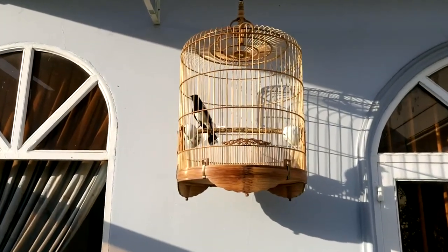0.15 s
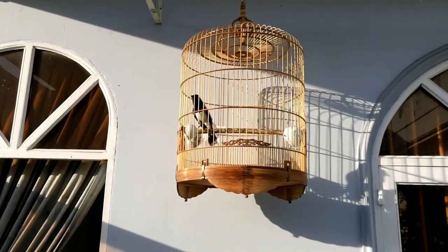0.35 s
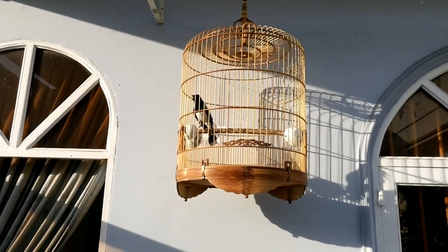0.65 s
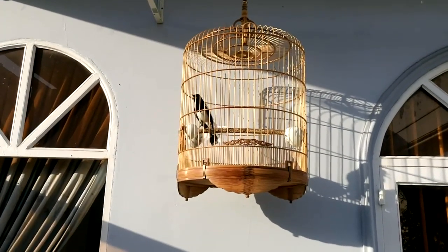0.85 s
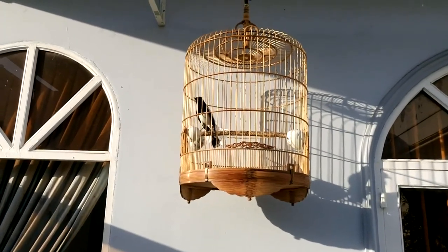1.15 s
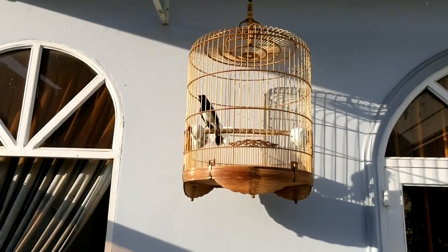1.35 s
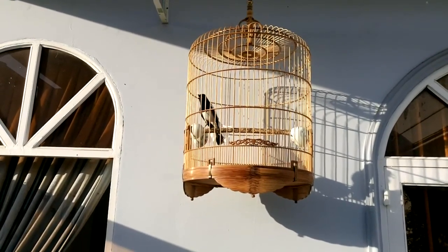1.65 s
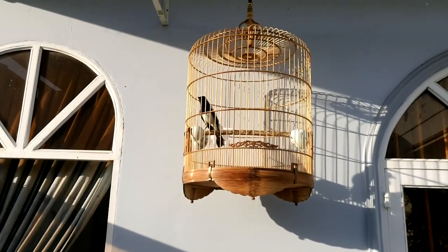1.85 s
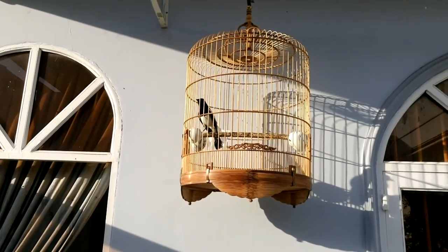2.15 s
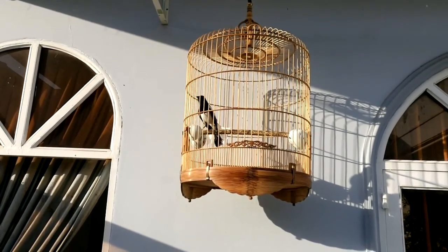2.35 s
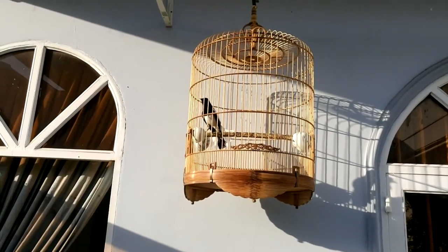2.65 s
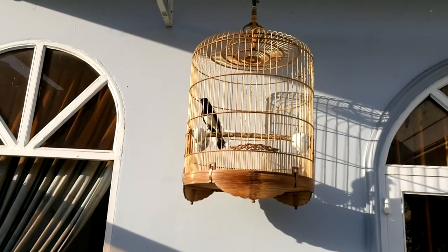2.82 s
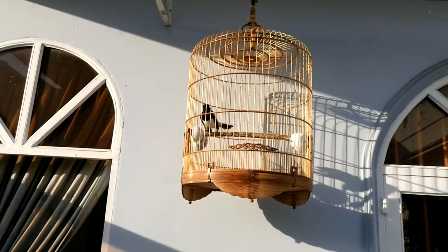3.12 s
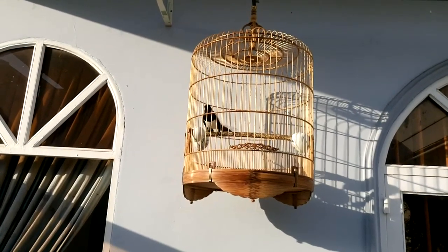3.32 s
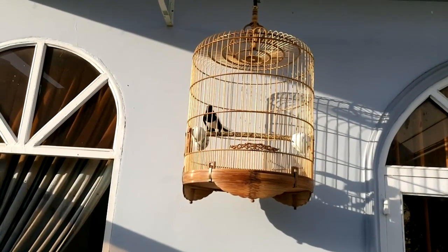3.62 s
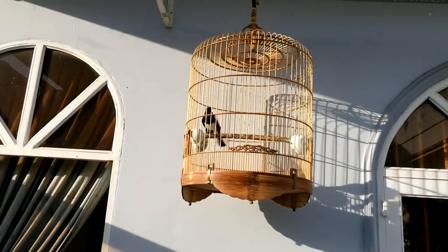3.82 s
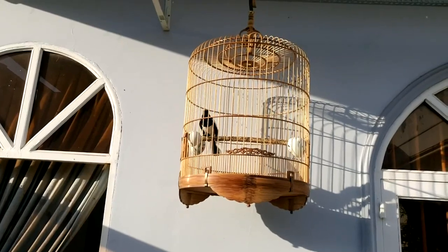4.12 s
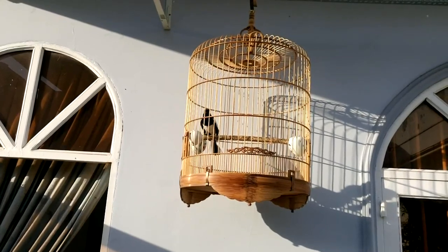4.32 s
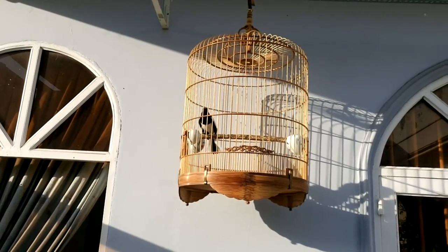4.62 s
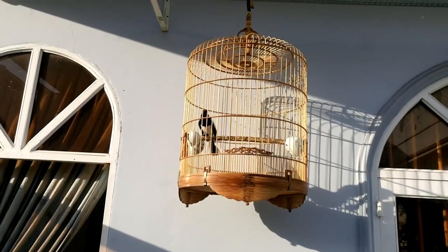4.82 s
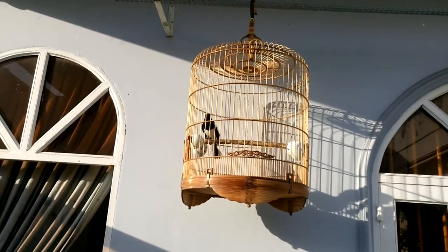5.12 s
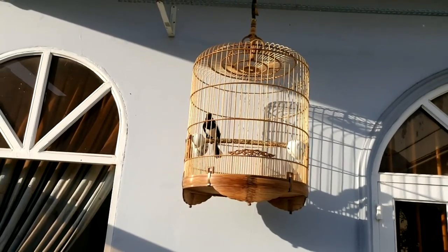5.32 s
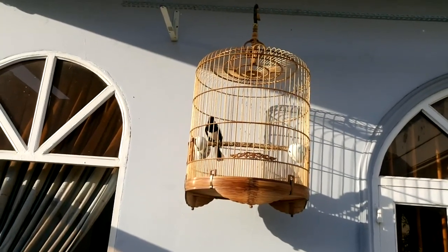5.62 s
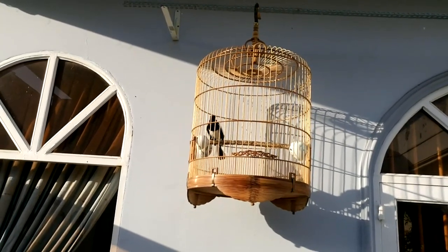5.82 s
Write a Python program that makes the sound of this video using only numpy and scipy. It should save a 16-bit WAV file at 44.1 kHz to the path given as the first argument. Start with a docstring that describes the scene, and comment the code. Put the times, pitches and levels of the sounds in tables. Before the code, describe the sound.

Outdoor stereo recording near a caged bird, its bright song stronger on the left. A busy phrase of whistles, drops and raspy rises fills the first two seconds over a distant rooster crow. A quiet neighbour warbles slightly right, then come steep chips, a buzz and three ticks. Far birds continue over faint traffic rumble and hiss, with porch echoes and brief overload on the loudest notes.

```python
"""Caged songbird in a walled yard

A magpie-robin sings close by: held whistles, plunges, buzzy rises and sharp falling chips, all gliding tones.
A softer bird warbles nearby, others answer from afar; a distant rooster crows at the start with pulses
and rasp, and a second one, of plain tones, faintly near the end. Delayed copies are the yard's echoes.
Filtered noise is the town's low rumble and thin hiss.
The loudest notes overload the recorder, which turns everything down for a moment.
"""
import sys
import numpy as np
from scipy import signal
from scipy.fft import rfft, irfft
from scipy.io import wavfile
from scipy.ndimage import uniform_filter1d

SR = 44100
rng = np.random.default_rng(int(sys.argv[2]) if len(sys.argv) > 2 else 0)


def transcribe(signal):
    """Save signal, clipped to [-1, 1], as a 16-bit WAV file at the path in sys.argv[1]."""
    frames = np.atleast_2d(signal).T
    limited = np.clip(frames, -1, 1)
    pcm = np.round(limited * 32767).astype(np.int16)
    wavfile.write(sys.argv[1], SR, pcm)


N = 263277  # length of the scene in samples


def amp(db):
    """Turns decibels into a gain."""
    return 10 ** (np.asarray(db) / 20)


def evened(x):
    """Scales a sound to an average (rms) strength of 1."""
    return x / np.sqrt(np.mean(x ** 2) + 1e-20)


def read(points, hz):
    """Reads a table between its points, with frequency on a log scale as the ear hears it."""
    point_hz, value = np.transpose(points)
    return np.interp(np.log(hz + 1), np.log(point_hz + 1), value)


def add(mix, start_s, sound):
    """Lays a sound into the mix at its start time, cut off where the mix ends."""
    part = mix[max(round(start_s * SR), 0):][:len(sound)]
    part += sound[:len(part)]


def colour(x, points):
    """Makes each frequency louder or softer by a table of pitch_hz and level_db."""
    size = 2 * N  # padding keeps the end from wrapping onto the start
    gain = amp(read(points, np.fft.rfftfreq(size, 1 / SR)))
    return irfft(rfft(x, size) * gain)[..., :N]


def drift(count, hz):
    """Random wander of rms about 1, with changes faster than hz smoothed away."""
    smoother = signal.butter(2, hz, fs=SR, output="sos")
    wander = signal.sosfilt(smoother, rng.standard_normal(N))
    return evened(wander)[-count:]


def progress(length_s):
    """Runs from 0 to 1 through a note."""
    return np.linspace(0, 1, round(length_s * SR))


def slide(along, start, end):
    """Eases from one value to another as along runs from 0 to 1."""
    return start + (end - start) * np.sin(np.pi / 2 * along) ** 2


def swell(along, peak, rise_db, release_db):
    """Level in dB that climbs to 0 at the share peak of a note, then moves to minus release_db."""
    peak = np.clip(peak, .01, .99)  # leave room on both sides
    return np.interp(along, [0, peak, 1], [-rise_db, 0, -release_db])


def syrinx(hz, level_db, jitter, overtone_db, fade_s):
    """A bird's voice organ: a nearly pure tone with an unsteady pitch and weak overtones."""
    unsteady_hz = hz * (1 + jitter * drift(len(hz), 250))
    phase = 2 * np.pi * np.cumsum(unsteady_hz) / SR
    t = np.arange(len(hz)) / SR
    nearest_end_s = np.minimum(t, t[-1] - t)
    fade = np.sin(np.pi / 2 * np.clip(nearest_end_s / fade_s, 0, 1)) ** 2
    third = np.sin(3 * phase) * (3 * hz < SR / 2)  # left out where digital sound cannot hold it
    overtones = np.sin(2 * phase) + amp(-24.0) * third
    return amp(level_db) * fade * (np.sin(phase) + amp(overtone_db) * overtones)


def tail(x, t60, start_s):
    """Scattered reflections that build up, then fall 60 dB in t60 seconds, different at each microphone."""
    t = np.arange(SR) / SR
    taps = rng.choice([-1., 1.], (2, SR)) * (rng.random((2, SR)) < 3000 / SR)  # about 3000 a second
    taps *= amp(-60 * t / t60) * (1 - np.exp(-(t / start_s) ** 2))
    taps /= np.linalg.norm(taps, axis=1, keepdims=True)
    return signal.fftconvolve(x[None], taps, axes=1)[:, :N]


# tone of the steady background before levelling: pitch_hz, level_db (per Hz)
TOWN_TONE = [(15, -36.5), (25, -18.5), (154, -0.5), (277, -12.5), (617, -16.5), (1170, -24.5),
             (1700, -22.5), (2730, -28.5), (3790, -22.5), (4470, -24.5), (5400, -31), (6220, -19),
             (7000, -36.5), (9100, -72), (15400, -120)]
# how alike left and right are: pitch_hz, likeness (0-1)
TOWN_LIKENESS = [(60, 0.85), (150, 0.97), (400, 0.72), (1020, 0), (2620, 0), (6730, 0.0014)]
TOWN_DB = -47.5
HISS_HZ, HISS_DB, HISS_SWING_DB = 4265, -3, -0.5  # lower edge, mean change, rms swing


def town():
    """Far traffic: noise with a low rumble shared by both sides, under a thin, slightly wavering hiss."""
    hz = np.fft.rfftfreq(N, 1 / SR)
    left, other = rfft(rng.standard_normal((2, N)))
    same = read(TOWN_LIKENESS, hz)
    right = same * left + np.sqrt(1 - same ** 2) * other
    noise = irfft(np.array([left, right]), N)
    pair = evened(colour(noise, TOWN_TONE))
    hiss = irfft(rfft(pair) / (1 + (HISS_HZ / (hz + 1)) ** 12), N)
    rumble = (pair - hiss) * amp(2.0 * drift(N, 26))
    hiss = hiss * amp(HISS_DB + HISS_SWING_DB * drift(N, 3.3))
    return amp(TOWN_DB) * amp([[1.2], [0]]) * (rumble + hiss)  # the left is a little louder


# resonances of the rooster's throat: pitch_hz, width_hz (one pass is twice this wide), level_db
THROAT = [(720, 227, 8.5), (1219, 130, 4), (1454, 400, 3), (2080, 670, -4.5)]


def throat(drive):
    """Throat resonances ring with the voice; each acts twice, for dark valleys between them."""
    voice = np.zeros(len(drive))
    for pitch_hz, width_hz, level_db in THROAT:
        peak = signal.iirpeak(pitch_hz, pitch_hz / width_hz / 2, fs=SR)
        once = signal.lfilter(*peak, drive)
        voice += amp(level_db) * signal.lfilter(*peak, once)
    return evened(voice)


# the pitch scoops up, holds and droops (shares of the pitch)
CROW_SCOOP, CROW_DROOP = .03, .05
# the level rises, holds and dies (shares of the note, then dB)
CROW_ATTACK, CROW_RELEASE, CROW_EDGE_DB = 0.16, 0.12, 6.5
CROW_FLUTTER_DB, CROW_FLUTTER_HZ = 3, 25  # the voice shakes


def crow_syllable(length_s, top_hz, db, rough):
    """Regular pulses and a breathy rasp pass the rooster's throat; roughness sets their balance."""
    along = progress(length_s)
    hz = top_hz * (1 - CROW_SCOOP * (1 - along) ** 4 - CROW_DROOP * along ** 4)
    edges = np.minimum(along / CROW_ATTACK, (1 - along) / CROW_RELEASE)
    level_db = db - CROW_EDGE_DB * (1 - np.minimum(edges, 1))
    level_db = level_db + CROW_FLUTTER_DB * drift(len(along), CROW_FLUTTER_HZ)
    unsteady_hz = hz * (1 + (0.016 + 0.0693 * rough) * drift(len(hz), 90))
    turns = np.cumsum(unsteady_hz) / SR
    # the overtones fade as the pitch sags and the beak closes
    brightness = np.minimum(hz / 750, 1) ** 6
    pulses = sum(brightness ** (k - 1) * np.cos(2 * np.pi * k * turns) for k in range(1, 4))
    rasp = (1 + np.cos(2 * np.pi * turns)) * rng.standard_normal(len(hz))
    return amp(level_db) * (np.sqrt(1 - rough) * throat(pulses) + np.sqrt(rough) * throat(rasp))


# parts of the crow, the last being the fall that ends it:
# start_s, length_s, pitch_hz, level_db (before distance), roughness (0-1)
CROW = [(0.049, 0.19, 701.7, -33, 0.77), (0.247, 0.032, 769, -24, 0.18), (0.341, .42, 769.2, -30.5, .45),
        (0.966, .2, 685.6, -33, 0.7), (1.2, .34, 765.7, -36.5, .06), (1.528, .11, 663, -32.5, 0.1)]


def rooster():
    """A hoarse voice that clears on its long last note, which ends with a fall in pitch, blurred by distance."""
    crow = np.zeros(N)
    for start_s, *syllable in CROW:
        add(crow, start_s, crow_syllable(*syllable))
    # a small body gives no bass; the tone also dips near 2450 Hz and lifts near 5500 Hz
    crow = colour(crow, [(400, -32.5), (620, -4), (2100, 4.5), (2450, -17.5), (5500, 12.0), (8000, -1)])
    return amp(-8) * crow + amp(-4.0) * tail(crow, t60=0.48, start_s=0.016)


# far birds; the last two rows are tones of a second, distant rooster's crow:
# start_s, length_s, from_hz, to_hz, level_db (before distance)
FAR_NOTES = [ (0, 0.051, 4480, 4130, -38.5), (0.116, 0.11, 2827, 3940, -37),
             (0.211, 0.082, 3910, 4176, -30.5), (0.362, 0.24, 3000, 3314, -29.5),
             (0.615, .15, 3540, 3672, -34.5), (0.906, .11, 2573, 2560, -31.5),
             (1.192, 0.12, 4210, 3130, -28.5), (1.31, 0.14, 3070, 2794, -30.5),
             (2.447, 0.15, 3272, 3950, -31), (2.534, 0.099, 4200, 4500, -38.5),
             (2.709, 0.11, 4140, 4080, -48.5), (2.689, 0.29, 2975, 3260, -31),
             (2.948, 0.092, 3640, 3564, -32.5), (3.297, .14, 2700, 2210, -31.5),
             (3.677, 0.12, 3127, 2773, -30), (3.786, 0.07, 3180, 3490, -33),
             (3.849, 0.098, 4440, 4930, -38), (4.459, 0.17, 3170, 3095, -43.5),
             (4.782, 0.17, 3558, 3541, -39.5), (4.914, 0.26, 4056, 4030, -50),
             (5.197, 0.25, 3514, 3950, -44.5), (5.549, 0.15, 4900, 4730, -42),
             (5.73, 0.21, 4920, 5035, -41.5), (5.593, 0.23, 2210, 2216, -51.5),
             (5.62, 0.24, 1086, 1142, -53), ]


def far_birds():
    """Distant whistles and a second rooster's tones, each a straight glide, arrive mostly as reflections."""
    song = np.zeros(N)
    for start_s, length_s, from_hz, to_hz, level_db in FAR_NOTES:
        hz = from_hz + (to_hz - from_hz) * progress(length_s)
        add(song, start_s, syrinx(hz, level_db, jitter=0.015, overtone_db=-28, fade_s=0.008))
    return amp(-11.5) * song + amp(-3.5) * tail(song, t60=0.76, start_s=0.0049)


# short soft slurs; the one at 3.557 carries on the fall of the robin's chip:
# start_s, length_s, from_hz, to_hz, level_db (before left-right balance)
SLURS = [(2.25, 0.07, 2170, 2800, -36), (3.231, 0.078, 3077, 2980, -35), (3.557, .135, 2925, 1858, -31),
         (3.67, .07, 1820, 1780, -35.5)]
SLUR_PEAK, SLUR_EDGE_DB = 0.19, 19.5  # loudest share of the note, drop at both ends
# turning points of the soft bird's long wavy note: time_s, pitch_hz, level_db (before left-right balance)
WAVY_NOTE = [(2.472, 3240, -40), (2.601, 2133, -36), (2.69, 2275, -38.5), (2.798, 2886, -38.5),
             (2.926, 1880, -40.5), (2.998, 2015, -47.5), (3.131, 2860, -28)]


def neighbour():
    """Soft pure tones a little to the right: a quiet bird's glides, and a slur that extends the robin's chip."""
    notes = []
    for start_s, length_s, from_hz, to_hz, db in SLURS:
        along = progress(length_s)
        level_db = db + swell(along, SLUR_PEAK, SLUR_EDGE_DB, SLUR_EDGE_DB)
        notes.append((start_s, slide(along, from_hz, to_hz), level_db))
    legs = []
    for here, there in zip(WAVY_NOTE, WAVY_NOTE[1:]):
        along = progress(there[0] - here[0])[:, None]
        legs.append(slide(along, np.array(here[1:]), np.array(there[1:])))  # pitch and level together
    notes.append((WAVY_NOTE[0][0], *np.concatenate(legs).T))
    song = np.zeros(N)
    for start_s, hz, level_db in notes:
        add(song, start_s, syrinx(hz, level_db, jitter=.003, overtone_db=-50, fade_s=.01))
    return amp([[-2], [2]]) * song + amp(-3.0) * tail(song, t60=0.2, start_s=0.0037)


WARBLE_HZ = 87.1  # average speed


def warble(count):
    """A fast, slightly uneven swing of the pitch."""
    swing_hz = WARBLE_HZ * (1 + 0.048 * drift(count, 56))
    return np.sin(2 * np.pi * np.cumsum(swing_hz) / SR)


OVERSHOOT, SETTLE_S = 0.04, .0035  # share of the pitch by which it starts sharp, time to settle
QUIVER_S, WHISTLE_EDGE_DB = .025, 9  # time for the quiver to die away, drop at soft ends


def whistle(length_s, from_hz, to_hz, db, peak, quiver_hz):
    """Pitch and level of a held note: it starts sharp, quivers briefly and steadies."""
    along = progress(length_s)
    t = along * length_s
    hz = (from_hz + (to_hz - from_hz) * along) * (1 + OVERSHOOT * np.exp(-t / SETTLE_S))
    quiver = quiver_hz * np.exp(-t / QUIVER_S) * warble(len(along))
    return hz + quiver, db + swell(along, peak, WHISTLE_EDGE_DB, WHISTLE_EDGE_DB)


def plunge(length_s, from_hz, to_hz, fall_s, db, fade_db):
    """Pitch and level of a sudden drop that fades as it bottoms out."""
    along = progress(length_s)
    fall = np.exp(-(along * length_s / fall_s) ** 2)
    return to_hz + (from_hz - to_hz) * fall, db - fade_db * along


RISE_RELEASE, RISE_RELEASE_DB = .14, 6.5  # extra drop over the last share of the note


def rise(length_s, from_hz, to_hz, bend, db, swell_db, depth_hz):
    """Pitch and level of a climb that grows louder while its warble widens into a buzz."""
    along = progress(length_s)
    climb = slide(along ** bend, 0, 1)
    hz = from_hz + (to_hz - from_hz) * climb + depth_hz * along * warble(len(along))
    level_db = db - swell_db * (1 - climb)
    return hz, level_db + swell(along, 1 - RISE_RELEASE, 0, RISE_RELEASE_DB)


# Levels in the robin's tables are before ROBIN_DB, the yard and the recorder.
# held whistles: start_s, length_s, from_hz, to_hz, level_db, loudest_at (0-1 of the length), quiver_hz
WHISTLES = [ (0.411, 0.053, 2850, 3000, -12.5, 0.2, 32), (0.473, 0.068, 2934, 2900, -12, 0, -6),
            (0.56, 0.035, 2846, 2770, -17.5, 0, -5), (0.849, 0.049, 6400, 6153, -4.5, 0.57, 248.5),
            (0.9, .037, 6056, 6134, 4, 0.6, 7), (1.016, 0.046, 6214, 5760, -3, .4, -2.5),
            (1.471, 0.03, 6036, 5913, -10.5, 0.3, 9.5), (1.496, .068, 6133, 6008, -2.5, .7, 139.5),
            (1.571, 0.033, 5994, 6030, -6, 0.3, -2), (1.676, 0.049, 6096, 5876, -6.5, .2, -2),
            (3.643, 0.021, 4544, 4450, -4, 0, 2), ]
# plunges out of a high note: start_s, length_s, from_hz, to_hz, fall_s, level_db, fade_db
PLUNGES = [ (0.808, .011, 5955, 4180, .005, -17.5, 11), (1.053, 0.019, 5750, 2424, 0.0087, 0.5, 34.5),
           (1.715, .046, 5900, 3660, .012, -9.5, 13.5), (4.197, .014, 3700, 2350, 0.0018, -33.5, 5.5), ]
# rises: start_s, length_s, from_hz, to_hz, bend (above 1 climbs late), top_level_db, swell_db, warble_hz (depth)
RISES = [ (0.815, 0.033, 4290, 5510, 0.85, -13, 13.5, 893), (1.077, .107, 3280, 5755, 0.91, -4, 24.5, 112),
         (1.762, 0.089, 3790, 5450, 1.05, -8.5, 22, 172.5), (3.607, .035, 3900, 4950, 1.5, -14, 16.5, -1.5),
         (4.132, 0.051, 4410, 5190, .85, -12.5, 21, 42), (4.203, .02, 2360, 3460, 0.74, -21, 6.5, 10),
         (4.234, 0.13, 3583, 5594, 1.35, -3.5, 14, 697.5), ]


def gliding_notes():
    """Whistles, plunges and rises: the voice organ follows each note's path of pitch and level."""
    song = np.zeros(N)
    for gesture, notes in (whistle, WHISTLES), (plunge, PLUNGES), (rise, RISES):
        for start_s, *note in notes:
            hz, level_db = gesture(*note)
            overtone_db = read([(3000, -26), (4500, -30), (6000, -33.5)], hz)  # weaker on high notes
            tone = syrinx(hz, level_db, jitter=.003, overtone_db=overtone_db, fade_s=0.0021)
            add(song, start_s, tone)
    return song


# the last three short, steep chips of the phrase: start_s, level_db (before STROKE_DB)
TICKS = [(4.485, -1), (4.622, 0), (4.741, -1)]
# a quick downstroke and its echo: delay_s, length_s, from_hz, to_hz, swell_db
STROKES = [(0, .0135, 7086, 5456, 17), (.016, .017, 6294, 5784, -2)]
STROKE_DB, STROKE_PEAK, STROKE_RELEASE_DB = -5, 0.36, -2.5  # a negative release grows louder


def ticks():
    """Short chips, each a quick slide down in pitch with an echo close behind."""
    song = np.zeros(N)
    for start_s, db in TICKS:
        for delay_s, length_s, from_hz, to_hz, swell_db in STROKES:
            along = progress(length_s)
            hz = slide(along, from_hz, to_hz)
            level_db = db + STROKE_DB + swell(along, STROKE_PEAK, swell_db, STROKE_RELEASE_DB)
            stroke = syrinx(hz, level_db, jitter=.007, overtone_db=-38.5, fade_s=0.002)
            add(song, start_s + delay_s, stroke)
    return song


CHIP_TOP_HZ, CHIP_KNEE_HZ, CHIP_FALL_S = 6950, 4268, .0058  # steep drop from top towards knee
CHIP_SLIDE_HZ_PER_S, CHIP_FADE_DB = 32500, 26.5
CHIP_WARBLE_HZ = 257  # depth of the warble at mid-chip


def chip(length_s, db):
    """Pitch and level of a steep drop that runs on into a wavering, fading slide."""
    along = progress(length_s)
    t = along * length_s
    drop_hz = (CHIP_TOP_HZ - CHIP_KNEE_HZ) * np.exp(-(t / CHIP_FALL_S) ** 2)
    hz = CHIP_KNEE_HZ + drop_hz - CHIP_SLIDE_HZ_PER_S * t
    waver_hz = CHIP_WARBLE_HZ * np.sin(np.pi * along) * warble(len(along))
    return hz + waver_hz, db - CHIP_FADE_DB * along ** 1.42


# long falling chips: start_s, length_s, level_db
CHIPS = [(3.0594, 0.06, -2.5), (3.541, 0.054, -2), (5.896, .054, -2)]


def long_chips():
    """Long falling chips, with a pitch less steady than the other notes."""
    song = np.zeros(N)
    for start_s, length_s, db in CHIPS:
        add(song, start_s, syrinx(*chip(length_s, db), jitter=.028, overtone_db=-26, fade_s=0.0041))
    return song


# where the voice breaks into a rasp: start_s, length_s, level_db (relative to the tone)
RASPS = [(0.803, 0.034, 1.5), (1.05, 0.059, 6.5), (1.698, 0.11, -13.5), (3.059, 0.01, -22),
         (3.529, 0.0129, 1.5), (4.178, 0.023, -3.5), (5.898, 0.025, -22)]
RASP_WIDTH_HZ = 550
ROBIN_DB = 3


def robin():
    """All the robin's notes; irregular beating of the membranes spreads some tones into a raspy band."""
    song = gliding_notes() + ticks() + long_chips()
    rasp = np.zeros(N)
    for start_s, length_s, level_db in RASPS:
        add(rasp, start_s, amp(level_db) * signal.windows.tukey(round(length_s * SR), .5))
    return amp(ROBIN_DB) * song * (1 + rasp * drift(N, RASP_WIDTH_HZ))


# echoes of the wall, ground and porch: delay_s, level_db
ECHOES = [(.0023, -11.5), (.0047, -11), (.0071, -11), (0.0099, -12), (0.0147, -6), (0.0225, -9.5),
          (0.0303, -15.5)]
# the right microphone is shaded from the robin's high notes: pitch_hz, level_db
SHADE = [(2000, 2), (3000, -1), (3800, -4.5), (4600, -2.5), (5500, -19), (6300, -14), (12000, -9)]


def yard(x):
    """Direct sound, single echoes, a short ring of the porch and a faint long tail from the houses."""
    near = np.array([x, x * 0])
    add(near[1], .00012, x)  # the sound reaches the right microphone a little later
    for delay_s, level_db in ECHOES:
        for ear in near:
            add(ear, delay_s + rng.uniform(0, .0002), amp(level_db) * x)
    near += amp(-6) * tail(x, t60=0.21, start_s=0.01)
    near[1] = colour(near[1], SHADE)
    return near + amp([[-23], [-28]]) * tail(x, t60=1.19, start_s=0.043)


def scene():
    """All the birds over the town."""
    return town() + rooster() + far_birds() + neighbour() + yard(robin())


# the microphones dip above the song's range and peak in the top octave: pitch_hz, level_db
MICROPHONE = [(6600, -1), (7600, -4.5), (8800, -12.5), (10800, -12.5), (12200, -6), (15000, 9)]
EDGE_HZ = 15700  # the recorder's upper limit


def record(dry):
    """Microphone colour; a fast limiter that ducks the background under loud notes; clipping; the band limit."""
    heard = colour(dry, MICROPHONE)
    peak_db = 20 * np.log10(abs(heard).max(0) + 1e-9)  # the louder side rules both
    recovery_db = np.arange(N) * 75.0 / SR  # 75 dB a second
    # hold each peak while it sinks at the recovery speed
    over_db = np.maximum(np.maximum.accumulate(peak_db + recovery_db) - recovery_db, 0)
    limited = heard * amp(-uniform_filter1d(over_db, size=90))
    clipped = np.clip(limited, -1, 1)
    band_limit = signal.firwin(511, EDGE_HZ, window=("kaiser", 9), fs=SR)
    return signal.oaconvolve(clipped, band_limit[None], "same")


dry = scene()
out = record(dry)
transcribe(out)
```